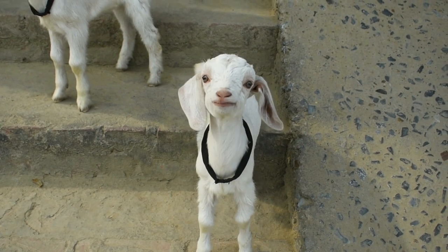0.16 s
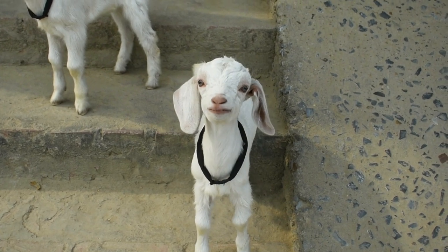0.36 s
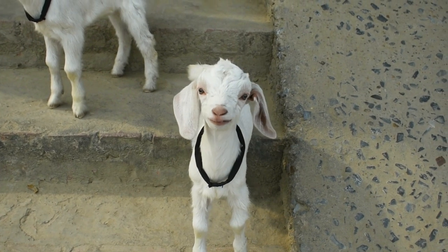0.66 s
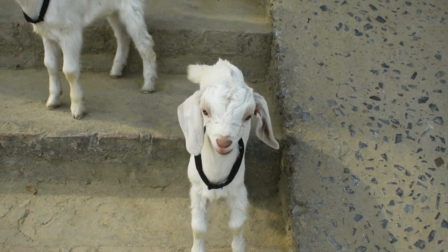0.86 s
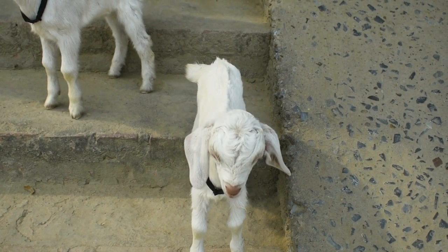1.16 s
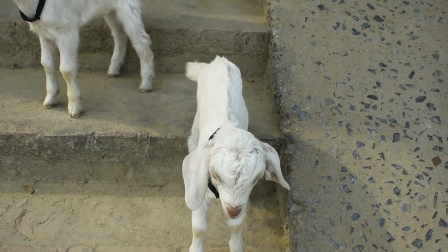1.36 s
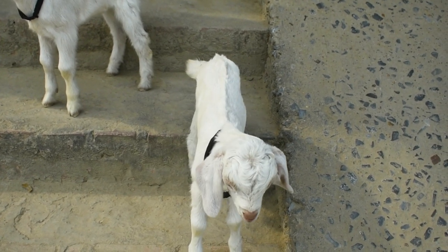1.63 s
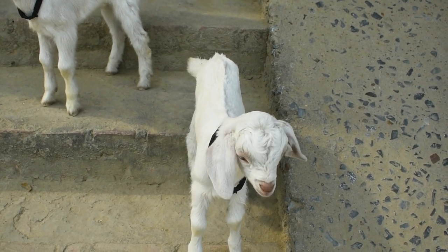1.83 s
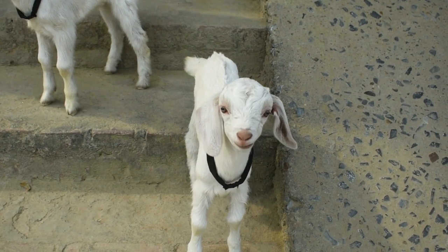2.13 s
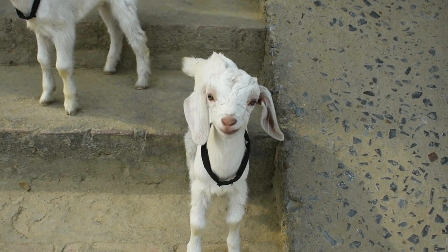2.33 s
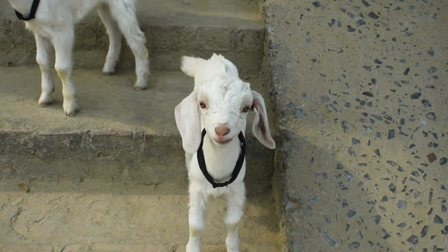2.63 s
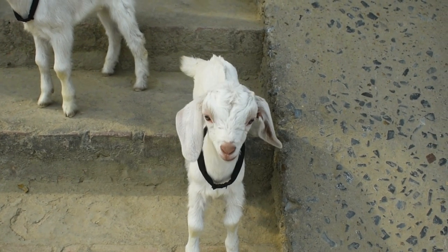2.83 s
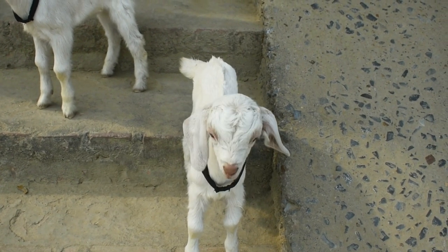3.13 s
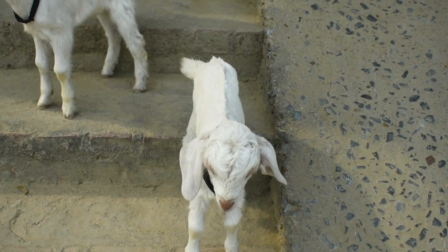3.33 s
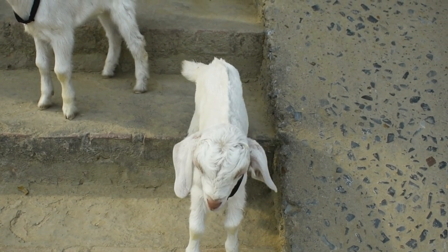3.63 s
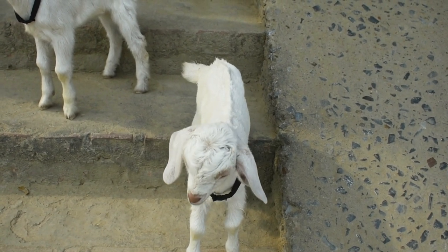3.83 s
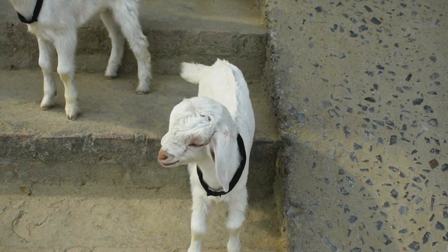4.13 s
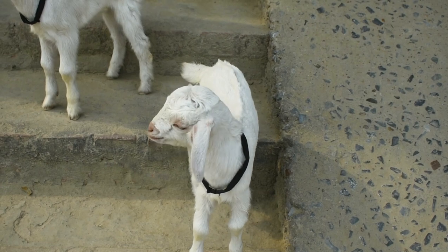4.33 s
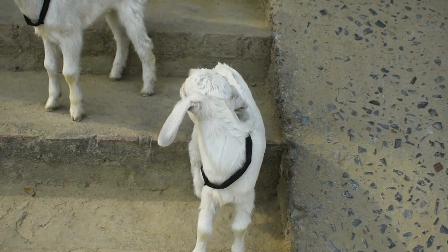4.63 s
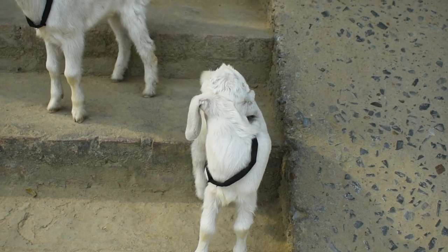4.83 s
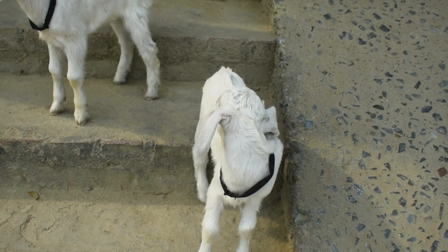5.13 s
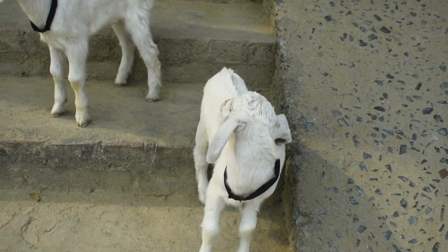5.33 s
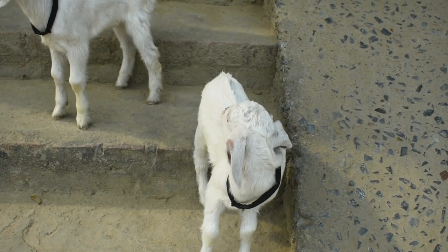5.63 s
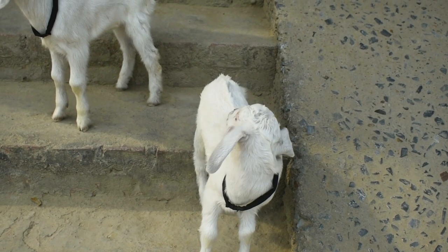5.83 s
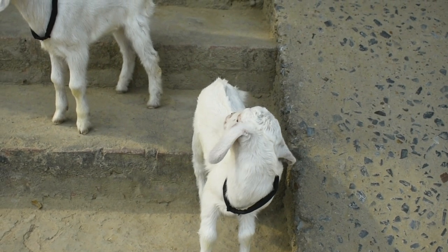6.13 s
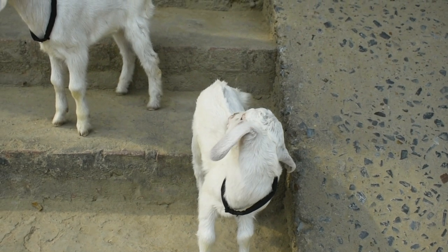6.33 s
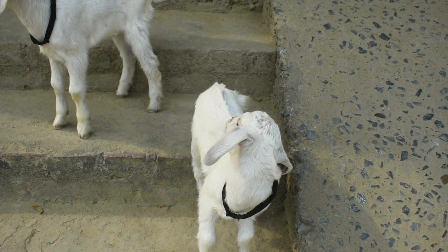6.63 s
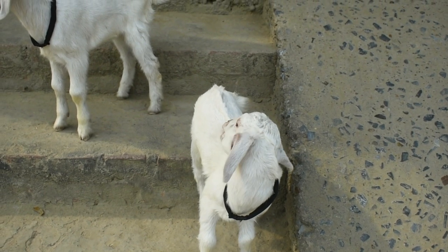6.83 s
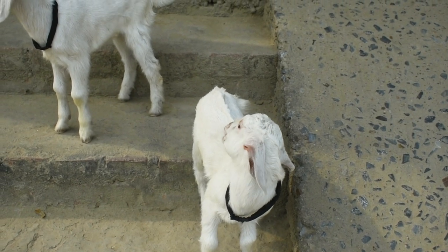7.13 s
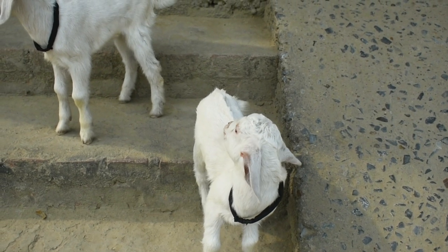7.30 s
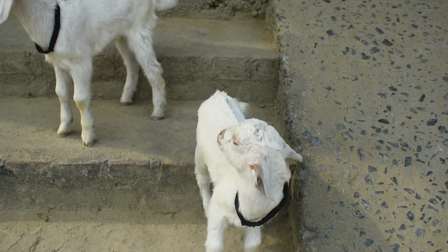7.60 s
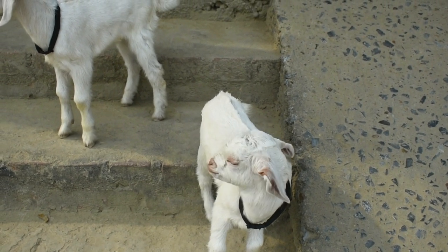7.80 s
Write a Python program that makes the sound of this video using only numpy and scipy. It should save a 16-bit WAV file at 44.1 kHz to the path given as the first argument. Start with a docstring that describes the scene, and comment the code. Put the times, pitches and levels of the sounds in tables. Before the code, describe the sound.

Quiet outdoor air with soft low thuds and faint falling bird whistles opens the scene. Then a goat kid calls nearby, high, nasal and trembling for almost a second. Two shorter, stronger-swelling bleats follow at wide intervals, each sagging into hoarseness. Mono, close and nearly dry, with slight hard-step echoes and a brief diffuse tail.

```python
"""Goat kid bleating on concrete steps

A kid bleats three times, close up and in mono: pulsing vocal folds and chopped air ring a moving throat.
Each bleat hums open and quavers, then sinks in pitch and turns hoarse as the mouth closes.
Short delays are the bounces off the steps, and decaying noise makes the diffuse tail.
Behind it lie filtered-noise outdoor hiss and rumble, soft noise bumps and gliding sine bird chirps."""
import sys
import numpy as np
from scipy import signal
from scipy.fft import rfft, irfft, next_fast_len
from scipy.io import wavfile
from scipy.ndimage import uniform_filter1d, map_coordinates

SR = 44100
rng = np.random.default_rng(int(sys.argv[2]) if len(sys.argv) > 2 else 0)


def wav_out(sig):
    """Save sig, one row per channel (or a flat mono array), as 16-bit PCM at SR to the path in sys.argv[1]."""
    wavfile.write(sys.argv[1], SR, np.round(np.clip(np.atleast_2d(sig).T, -1, 1) * 32767).astype(np.int16))


N = 351036  # length [samples]
TOP_HZ = 15720  # upper band limit of the whole sound

# spectrum of the open air: (frequency [Hz], relative density [dB per Hz])
AIR_SPECTRUM = [(15, -46), (25, -16), (27, -30), (37, -29), (56, -15), (101, -14.5), (221, -9), (359, -4.5),
                (399, -4.5), (631, -3), (1080, -2.5), (1300, -4.5), (2170, -5.5), (8810, -15),
                (15500, -23.5)]
AIR_DB = -49.5
# low rumble that comes and goes: (time [s], level [dB])
RUMBLE_LEVEL = [(0, -73.5), (2.4, -74), (3.1, -80), (5.6, -78), (6.2, -72), (7.9, -74)]
# soft low bumps, before their common gain: (time [s], peak [dB])
BUMP_TIMES = [(0.022, -52), (0.343, -48), (0.375, -53), (0.717, -45.5), (0.765, -47.5), (0.81, -49),
              (1.132, -44.5), (1.45, -52), (1.71, -47.5), (1.959, -50), (2.05, -42.5), (2.728, -42),
              (2.758, -46), (6.118, -49), (6.631, -51), (6.886, -45), (7.531, -52)]
# body of a bump: (centre [Hz], width [Hz], level [dB])
BUMP_RESONANCES = [(98, 140, 0), (173, 156, 1)]
# distant birds, before the bird gain:
# (time [s], length [s], start pitch [Hz], end pitch [Hz], level [dB], hoarseness [about 0-1])
BIRD_CHIRPS = [(.09, 0.14, 6770, 5600, -60, 0.8), (.12, 0.17, 5350, 4470, -57.5, 0.6),
               (.86, 0.1, 3800, 3810, -60, 0.85), (1.03, 0.29, 3830, 3590, -59, 1.07),
               (1.21, .08, 6000, 5850, -63, .5), (1.58, 0.16, 3405, 3200, -60, 0.88),
               (3.859, 0.039, 3520, 3290, -56, 0.3), (3.989, 0.055, 2610, 2515, -50.5, 0),
               (5.84, 0.13, 3550, 2870, -59, .5), (5.94, 0.046, 2844, 2777, -49, 0.25),
               (6.864, 0.032, 3420, 3300, -52, 0.2), (6.99, 0.044, 2570, 2570, -54.5, 0.16)]
# diffuse tail of the yard: (frequency [Hz], time to fall 60 dB [s])
YARD_DECAY = [(500, 0.6), (4000, 0.42), (7000, 0.17), (14000, 0.043)]
# echoes off the nearest steps: (delay [s], level [dB])
STEP_ECHOES = [(.0031, -50), (.0074, -18), (0.0118, -17.5), (.021, -23.5), (.034, -19)]

# air at the lips: (frequency [Hz], relative density [dB per Hz])
LIP_SPECTRUM = [(1000, -23), (3000, -10), (5000, -8), (6000, -12), (8000, 2), (9000, -12), (13000, -17),
                (15500, -33)]
# resonances of the nose during the hum: (centre [Hz], width [Hz], level [dB])
NOSE_RESONANCES = [(630, 410, -15), (1230, 1030, -0.5), (2100, 660, -16), (2970, 700, 2), (4000, 1700, 0),
                   (5500, 1400, -2)]
# lower resonances of the open mouth, set anew for each bleat; # one list per bleat: (centre [Hz], width [Hz],
# level [dB])
VOWEL_RESONANCES = [
    [(1530, 360, -9.5), (1985, 174, -10), (3200, 330, -20), (3850, 170, -4)],
    [(1535, 400, -9.5), (1974, 210, -6.5), (3000, 260, -22.5), (3812, 160, -1.5)],
    [(1480, 184, -9.5), (1980, 440, -12.5), (2850, 650, -22.5), (3792, 165, -5)],
]
# upper throat resonances with the mouth open: (centre [Hz], width [Hz], level [dB])
OPEN_RESONANCES = [(4396, 1280, -9.5), (5308, 296, 3), (5793, 654, 0.5), (7830, 1090, -20.5),
                   (10300, 1100, -35), (12560, 2400, -38.5)]
# all resonances with the mouth nearly shut: (centre [Hz], width [Hz], level [dB])
SHUT_RESONANCES = [(1673, 280, -1.5), (2820, 850, -16), (4200, 460, -11.5), (5810, 860, -2),
                   (6380, 720, 1.5), (7470, 830, -10.5), (12000, 3300, -51)]
# one row per bleat, before the kid gain: (start [s], hum length [s], mouth opening time [s],
# loudest at [s], release at [s], peak level [dB], swell [dB/s], pitch [Hz],
# pitch rise time [s], pitch drop at [s], drop time [s], base roughness [0-1])
BLEAT_GESTURES = [(1.78, 0.079, 0.022, 2.51, 2.688, -17.5, 3, 855.7, 0.052, 2.66, .035, .105),
                  (4.128, 0.039, .036, 4.604, 4.75, -11, 20.5, 815, .07, 4.77, .015, 0.08),
                  (7.101, 0.039, 0.04, 7.55, 7.774, -13.5, 22, 799.3, .088, 7.768, .018, .095)]
# catches of the voice that make it quaver: (time [s], half length [s], pitch dip [Hz],
# level dip [dB], added brightness [dB per octave], added roughness [0-1])
VOICE_CATCHES = [(1.893, .031, 95, -0.5, -2.5, 0.03), (1.94, .017, 128, 5.5, 2.5, 0.38),
                 (1.961, .012, 5, 7.5, 3.5, .15), (1.982, .021, 80, 2, 0.5, 0),
                 (2.068, .04, 92, -0.5, 1, 0.16), (2.197, .035, 91, 0, 1, 0.4),
                 (2.304, .027, 72, 0.5, 1, 0.18), (2.53, .015, 53, 0.5, 1, 0.06),
                 (2.568, .013, 30, -1.5, 1, 0.03), (2.618, 0.019, 50, 2, 2, 0),
                 (4.209, .013, 44, 9, 2.5, .35), (4.291, .025, 58.6, 4.5, 2, .15),
                 (4.37, .035, 11, 0, 0, 0), (7.179, .037, 122, 3, 4.5, 0), (7.194, .008, 8, 2, 1, 0.2),
                 (7.27, .028, 101, 2.5, 2, 0.2), (7.362, 0.029, 57, 3, 2, 0.1),
                 (7.471, .025, 32.8, 2, 1, .04)]

# the pitch starts low, sags as the air runs out, drops as the folds slacken
SCOOP_HZ, SAG_HZ_PER_S, DROP_HZ = 290, 120, 220.1
HUM_DB, HUM_SWELL_DB_PER_S = -41, 190  # the hum just before the mouth opens
# fade after the loudest moment, steeper fall after the release, and how long that lasts
FADE_DB_PER_S, RELEASE_DB_PER_S, RELEASE_S = 36, 238, .11
FULL_DB = -10  # bleat level that counts as full push
MOUTH_WIDE = 0.96  # widest opening [0-1]
PALATE_S = .0055  # time to switch from nose to mouth
SHUT_LAG = .6  # the mouth is half shut this many drop times after the pitch drop
CRACK_ROUGH, CRACK_DELAY_S, CRACK_S = 0.52, .012, .014  # the voice cracks just after the mouth opens
CRACK_LEAD = 0.86  # a quaver cracks on the way down, this share of its half length early
HOARSE_LAG, HOARSE_S = 1.08, .011  # it turns to rasp this many drop times after the drop, this fast
# brightness of the folds [dB per octave] at full push, and its change per dB of push
BRIGHT_DB, BRIGHT_PER_DB = 1.78, 0.31
# the hum brightens as it swells: extra dB per octave at its end, change per dB
HUM_BRIGHT_DB, HUM_BRIGHT_PER_DB = 3, 0.65


def amp(db):
    """Decibels to gain."""
    return 10 ** (np.asarray(db) / 20)


def unit(x):
    """Scale to rms 1."""
    return x / np.sqrt(np.mean(x ** 2) + 1e-20)


def along(points, hz):
    """Read (Hz, value) points on a log frequency axis."""
    f, v = np.transpose(points)
    return np.interp(np.log(hz + 1), np.log(f + 1), v)


def curves(rows, t):
    """Each column after the time, joined by straight lines."""
    s, *columns = np.transpose(rows)
    return [np.interp(t, s, column) for column in columns]


def wobble(rate, size):
    """A smooth random curve with rate knots a second."""
    knots = rng.standard_normal(int(size * rate / SR) + 4)
    return map_coordinates(knots, [np.arange(size) * rate / SR])


def bell(t, centre, width):
    """A smooth bump of height 1."""
    return np.exp(-((t - centre) / width) ** 2)


def switch(t, centre, width):
    """A smooth step from 0 to 1."""
    return .5 + .5 * np.tanh((t - centre) / (2 * width))


def filtered(x, response):
    """Shape the spectrum of x by a response of frequency."""
    m = next_fast_len(len(x) + SR // 4)
    return irfft(rfft(x, m) * response(np.fft.rfftfreq(m, 1 / SR)), m)[:len(x)]


def resonate(x, modes, size=4096):
    """Ring x through a causal filter with steep-sided resonances."""
    hz = np.fft.rfftfreq(size, 1 / SR)
    power = sum((amp(db) / (1 + (2 * (hz - c) / w) ** 2)) ** 2 for c, w, db in modes)
    gain = np.sqrt(power)
    gain *= hz ** 2 / (hz ** 2 + (modes[0][0] / 2) ** 2)  # little radiates below the lowest resonance
    # folding the cepstrum forward in time gives the minimum-phase filter
    cepstrum = irfft(np.log(gain + 1e-6))
    cepstrum[1:size // 2] *= 2
    cepstrum[size // 2 + 1:] = 0
    impulse = irfft(np.exp(rfft(cepstrum)))
    return signal.fftconvolve(x, impulse)[:len(x)]


def outdoors(drift_db=0.63):
    """A nearly even, faint hiss of open air over a rumble that comes and goes."""
    hiss = unit(filtered(rng.standard_normal(N), lambda hz: amp(along(AIR_SPECTRUM, hz))))
    rumble = unit(resonate(rng.standard_normal(N), [(90, 160, 0)]))
    rumble_db, = curves(RUMBLE_LEVEL, np.arange(N) / SR)
    return hiss * amp(AIR_DB + drift_db * wobble(2.82, N)) + rumble * amp(rumble_db)


def bumps(t60=0.052, rise=.014, gain_db=1):
    """Dull little thuds: soft-edged, fast-dying noise through two broad low resonances."""
    out, t = np.zeros(N + SR), np.arange(SR // 5) / SR
    for s, db in BUMP_TIMES:
        burst = rng.standard_normal(len(t)) * amp(-60 * t / t60) * (1 - np.exp(-t / rise)) ** 2
        thud = resonate(burst, BUMP_RESONANCES)
        out[round(s * SR):][:len(t)] += amp(db + gain_db) * thud / np.abs(thud).max()
    return out[:N]


def birds(scatter=0.0507):
    """Short, mostly falling sine whistles; fast random pitch scatter makes some of them hoarse."""
    out = np.zeros(N + SR)
    for s, length, start_hz, end_hz, db, hoarse in BIRD_CHIRPS:
        n = round(length * SR)
        hz = np.linspace(start_hz, end_hz, n) * (1 + scatter * hoarse * wobble(601, n))
        whistle = np.sin(2 * np.pi * np.cumsum(hz) / SR) * signal.windows.tukey(n, .7)
        out[round(s * SR):][:n] += amp(db) * unit(whistle)
    return out[:N]


def yard(x):
    """A short diffuse tail of decaying noise; the treble dies first."""
    hz, t, z = signal.stft(rng.standard_normal(SR // 2), SR, nperseg=256)
    decay = amp(-60 * t / along(YARD_DECAY, hz)[:, None])
    tail = signal.istft(z * decay, SR, nperseg=256)[1]
    return signal.fftconvolve(x, tail / np.linalg.norm(tail))[:N]


def steps(x):
    """The direct sound and its first bounces off the concrete."""
    return x + sum(amp(db) * np.pad(x, (round(delay * SR), 0))[:N] for delay, db in STEP_ECHOES)


def folds(phase, hz, bright, flutter_db, count=26):
    """A pulse train of rms near 1; its overtones tilt with brightness and each flutters a little."""
    k = np.arange(1, count)[:, None]  # harmonic numbers
    flutter = np.array([wobble(44.86, len(hz)) for _ in k])
    size = amp(bright * np.log2(k) + flutter_db * flutter) * (k * hz < SR / 2)
    return (size * np.cos(k * phase)).sum(0) / np.sqrt((size ** 2).sum(0) / 2)


def quavers(t):
    """Catches bend pitch, level and the folds' edge: (pitch [Hz], level [dB], edge [dB/octave], roughness)."""
    s, width, dip_hz, dip_db, edge, rough = np.transpose(VOICE_CATCHES)
    catches = bell(t[:, None], s, width)
    cracks = bell(t[:, None], s - CRACK_LEAD * width, CRACK_S)
    return catches @ dip_hz, catches @ dip_db, catches @ edge, cracks @ rough


def gesture(start, hum_s, open_s, loudest, release, peak_db, swell, pitch_hz, rise_s, drop, drop_s, roughness):
    """A bleat hums, opens, swells and fades; at last the folds slacken, the pitch drops and the mouth shuts."""
    t = np.arange(round(start * SR), min(round((release + RELEASE_S) * SR), N)) / SR
    age, opens = t - start, start + hum_s
    opening = 1 - np.exp(-np.maximum(t - opens, 0) / open_s)
    slack = switch(t, drop, drop_s)
    dip_hz, dip_db, edge, cracks = quavers(t)

    open_db = peak_db + np.minimum(swell * (t - loudest), FADE_DB_PER_S * (loudest - t))
    push_db = open_db - FULL_DB
    hum_db = HUM_DB + HUM_SWELL_DB_PER_S * np.minimum(t - opens, 0)
    level = (1 - opening) * hum_db + opening * open_db - dip_db
    level -= RELEASE_DB_PER_S * np.maximum(t - release, 0)

    pitch = pitch_hz - SCOOP_HZ * np.exp(-age / rise_s) - SAG_HZ_PER_S * age - DROP_HZ * slack - dip_hz
    nose = 1 - switch(t, opens, PALATE_S)
    mouth = opening ** 2 * MOUTH_WIDE * (1 - switch(t, drop + SHUT_LAG * drop_s, drop_s))
    bright = BRIGHT_DB + BRIGHT_PER_DB * push_db + edge
    bright += nose * (HUM_BRIGHT_DB + HUM_BRIGHT_PER_DB * (hum_db - HUM_DB))

    opening_crack = CRACK_ROUGH * bell(t, opens + CRACK_DELAY_S, CRACK_S)
    final_rasp = switch(t, drop + HOARSE_LAG * drop_s, HOARSE_S)
    rough = roughness + cracks + opening_crack + final_rasp
    return pitch, level, bright, np.clip(rough, 0, 1), np.clip(mouth, 0, 1), nose


def bleat(call, vowel, jitter=0.0283, waver=0.00213, tremor=0.00223, shimmer_db=3, rasp=0.39,
          flutter_db=1.46, rough_flutter_db=6.5, hiss_db=-30.5, doubling=.17):
    """Fold pulses and the air that they chop ring the throat, whose shape follows the jaw."""
    pitch, level, bright, rough, mouth, nose = gesture(*call)
    start, n = round(call[0] * SR), len(pitch)
    # the folds drift a little always, and stumble from cycle to cycle when rough
    drift = waver * wobble(69.1, n) + tremor * wobble(23.9, n)
    hz = pitch * (1 + drift + jitter * rough * wobble(520, n))
    phase = 2 * np.pi * np.cumsum(hz) / SR
    pulses = folds(phase, hz, bright, flutter_db + rough_flutter_db * rough)
    pulses *= amp(shimmer_db * rough * wobble(260, n))
    pulses *= 1 + doubling * rough * np.cos(phase / 2)  # rough folds alternate strong and weak pulses
    # air escapes once a cycle; at full roughness it takes over from the pulses
    air, lip_air = rng.standard_normal((2, n)) * (1 + np.cos(phase))
    source = (1 - rough ** 2) * pulses + rasp * rough * unit(air)

    open_voice = unit(resonate(source, vowel + OPEN_RESONANCES))
    shut_voice = unit(resonate(source, SHUT_RESONANCES))
    oral = mouth * open_voice + (1 - mouth) * shut_voice
    # each bleat begins as a dull hum through the nose
    voice = (1 - nose) * oral + nose * unit(resonate(source, NOSE_RESONANCES))
    # even out the loudness over about 20 ms, so that the level curve alone shapes it
    voice /= np.sqrt(np.abs(uniform_filter1d(voice ** 2, size=900)) + 1e-20)
    hiss = amp(hiss_db) * unit(filtered(lip_air, lambda f: amp(along(LIP_SPECTRUM, f))))
    sound = (voice + hiss) * amp(level) * signal.windows.tukey(n, .03)
    return np.pad(sound, (start, N - start - n))


def scene(kid_db=0.5, kid_wet_db=-17, bird_db=-2, bird_wet_db=-6):
    """The near kid is almost dry, the far birds are wetter; both channels carry the same sound."""
    kid = amp(kid_db) * sum(bleat(call, vowel) for call, vowel in zip(BLEAT_GESTURES, VOWEL_RESONANCES))
    song = birds()
    direct = steps(kid) + amp(bird_db) * song
    tail = yard(amp(kid_wet_db) * kid + amp(bird_wet_db) * song)
    mono = direct + tail + bumps() + outdoors()
    return np.array([mono, mono])


def record(dry):
    """Nothing passes at or above the band limit."""
    return np.array([filtered(channel, lambda hz: hz < TOP_HZ) for channel in dry])


dry = scene()
out = record(dry)
wav_out(out)
```